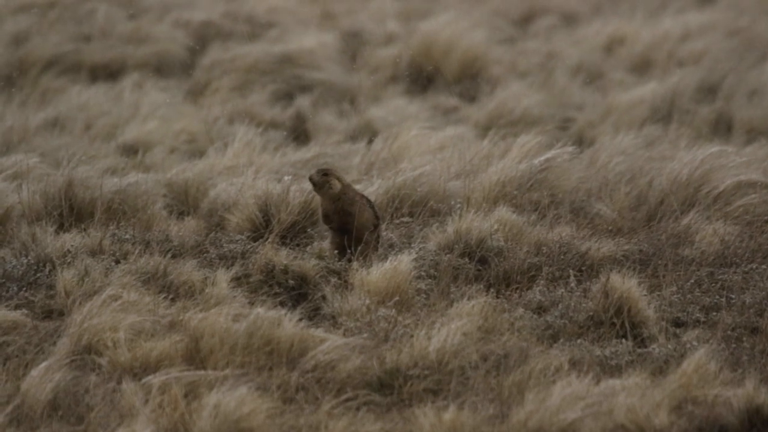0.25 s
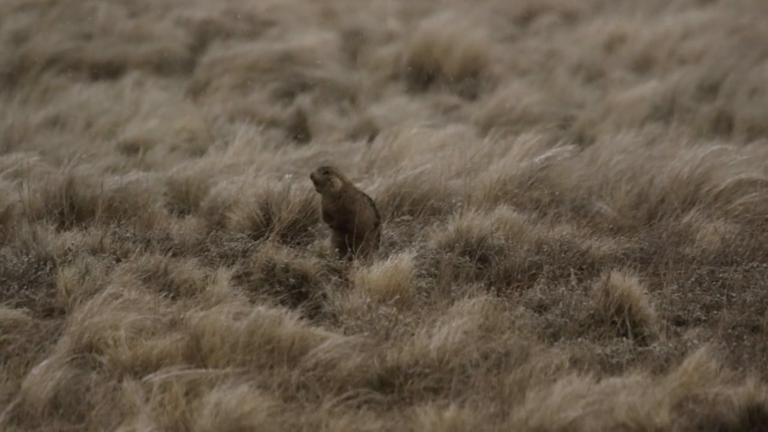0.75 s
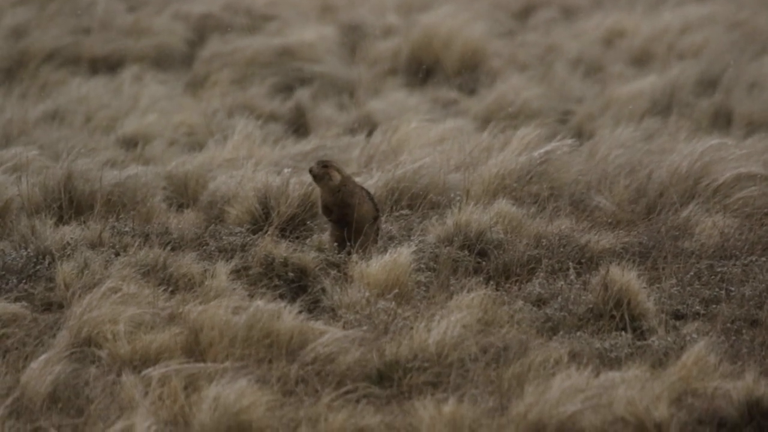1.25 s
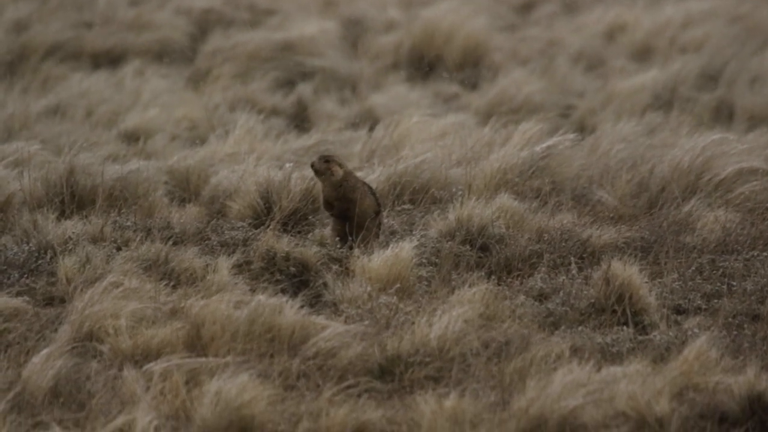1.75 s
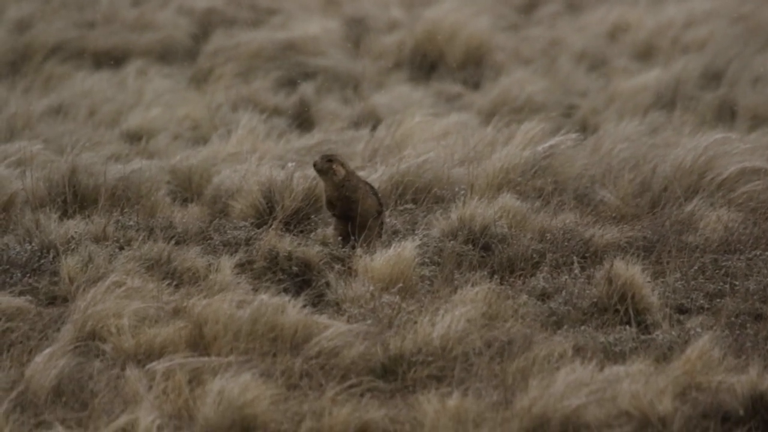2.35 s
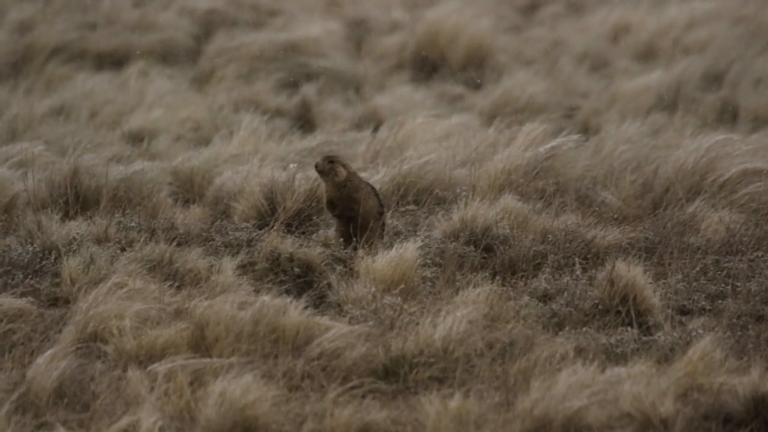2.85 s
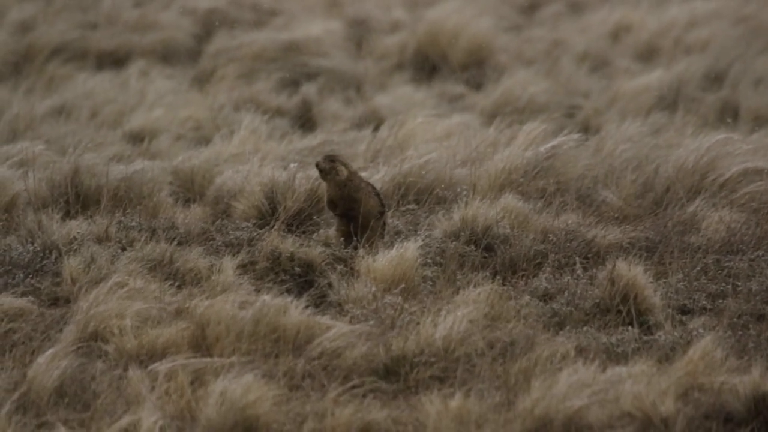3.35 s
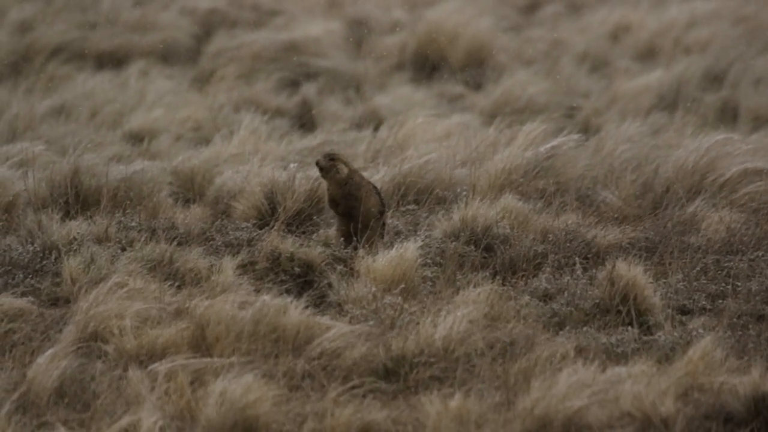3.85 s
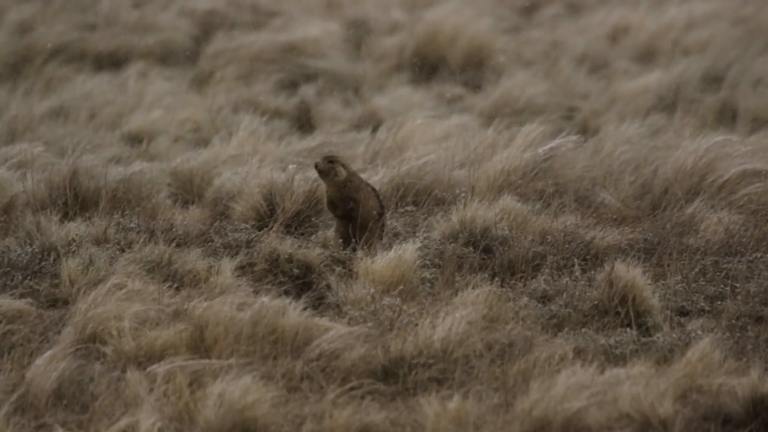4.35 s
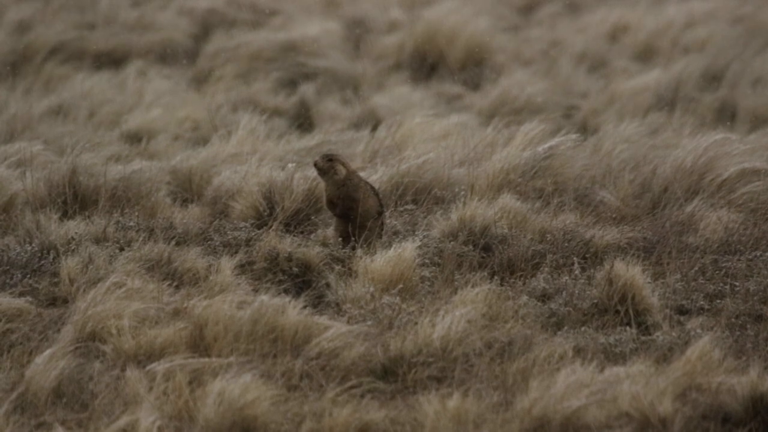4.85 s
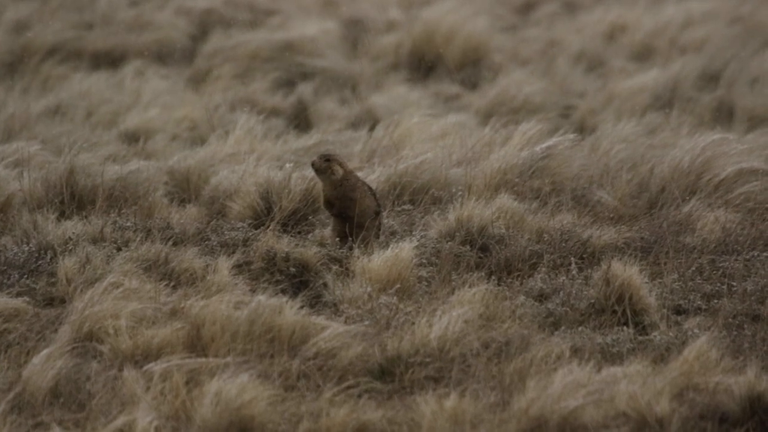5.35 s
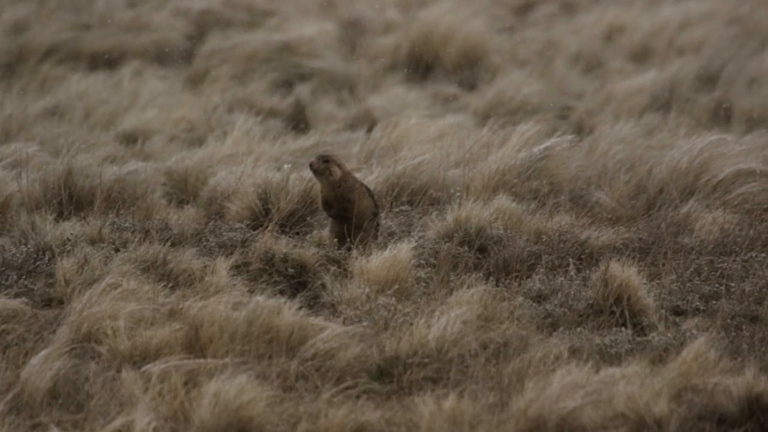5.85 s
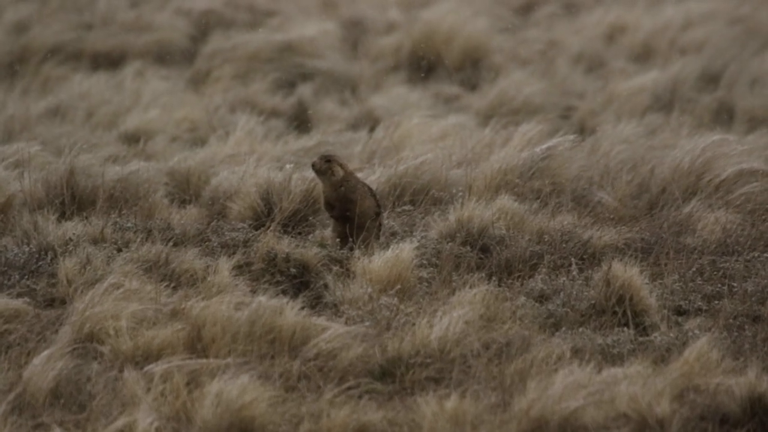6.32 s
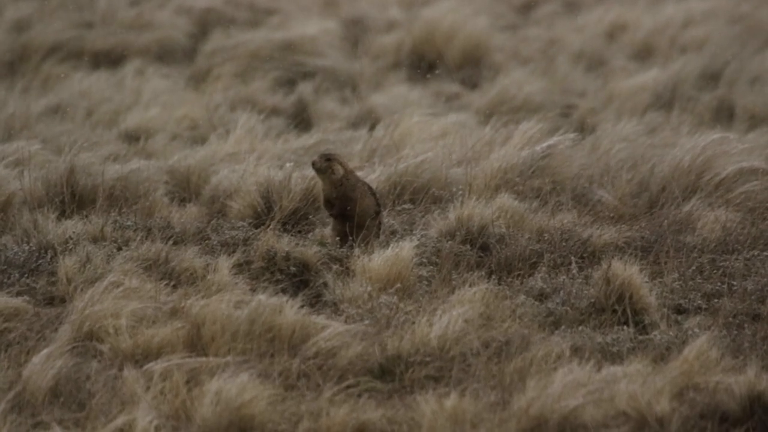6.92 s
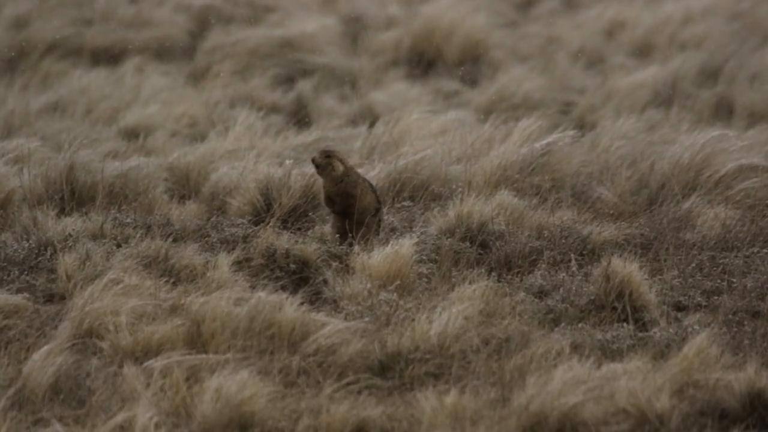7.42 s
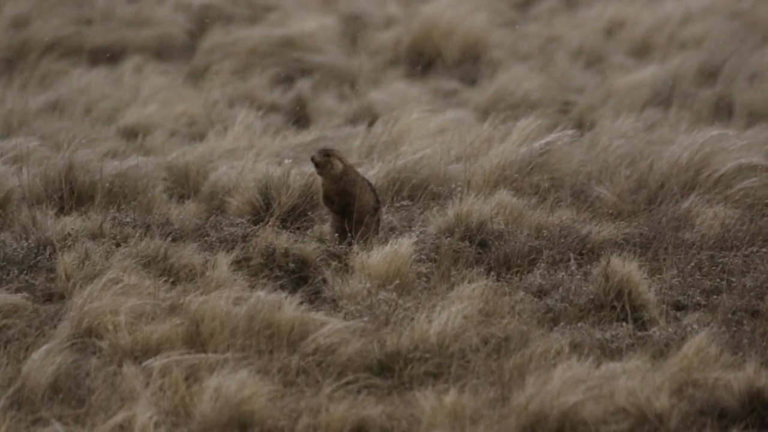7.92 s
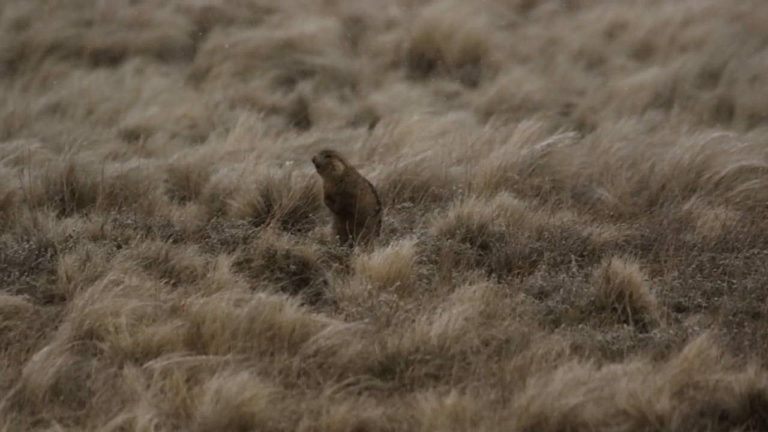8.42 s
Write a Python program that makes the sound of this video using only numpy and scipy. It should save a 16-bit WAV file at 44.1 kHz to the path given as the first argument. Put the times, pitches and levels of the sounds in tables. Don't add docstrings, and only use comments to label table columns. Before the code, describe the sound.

In open dry grassland a prairie dog barks in three bouts: five short, sharp, high yaps, a pause, five more, a longer pause, then four. Faint hoarse in-breaths follow a few. Close to the microphone, dry stalks rub, crackle and snap during the first two and a half seconds, then only isolated ticks. Low wind thumps come and go over soft hiss and a distant hum.

```python
import sys
import numpy as np
from scipy import signal
from scipy.fft import rfft, irfft, next_fast_len
from scipy.io import wavfile
from scipy.ndimage import uniform_filter1d, map_coordinates

SR = 44100
rng = np.random.default_rng(int(sys.argv[2]) if len(sys.argv) > 2 else 0)


def gain_from_db(level_db):
    decades = np.asarray(level_db, float) / 20
    return 10 ** decades


def unload_wav(signal):
    wavfile.write(
        sys.argv[1],
        SR,
        np.round(np.clip(np.atleast_2d(signal).T, -1, 1) * 32767).astype(np.int16),
    )


N = 382788
TIME = np.arange(N) / SR

# (start [s], length [s], top pitch [Hz], level [dB])
BARK_TIMES = [(0.2042, 0.095, 1010, -18), (.5435, 0.093, 1001, -19.5), (0.883, 0.094, 1003, -20),
              (1.226, 0.093, 990, -19.5), (1.614, 0.084, 976, -19.5), (3.5, 0.093, 996, -20),
              (3.885, 0.092, 1004, -19.5), (4.248, 0.095, 992, -21), (4.673, 0.084, 977, -23),
              (5.064, 0.084, 979, -23), (7.2936, 0.097, 1000, -19.5), (7.686, 0.1, 1018, -19.5),
              (8.065, 0.106, 1014, -18), (8.423, .1, 1000, -19.5)]
# (time after start [s], depth [dB], second push below first [dB])
THROAT_CATCHES = [(0.036, 4.5, 4.5), (0.038, 12, 2.5), (0.04, 12.5, 2), (0.031, 0, 4.5), (.035, 2, 4),
                  (0.043, 7, 4), (0.036, 5, 5), (0.036, 2, 3.5), (0.039, -1, 2.5), (0.039, 5, 3),
                  (0.036, 1, 3.5), (0.058, 5, 2), (0.038, 4, 4), (0.043, 4.5, 2)]
# (frequency [Hz], level [dB per Hz])
TEETH_AIR = [(3000, -40), (5500, -16), (7000, -7), (8500, 13), (10000, -13), (13500, 1), (16000, -36)]
BREATH_DB, BURST_DB, BURST_S = -37, -2, 0.012


def barks():
    out = np.zeros(N + SR)
    t = np.arange(SR // 6) / SR
    breath = coloured(rng.standard_normal(N), TEETH_AIR)
    for (start, length, top_hz, db), catch in zip(BARK_TIMES, THROAT_CATCHES):
        after = np.clip(t - length, 0, 1)
        level_db, ring_db = effort(t, length, top_hz, db, *catch)
        opening = np.clip(t / 0.00097, 0, 1) * np.clip(0.59 + t / 0.014, 0, 1)
        closing = gain_from_db(-600 * after - 4.5 * np.clip(after / 0.0011, 0, 1))
        gate = opening * closing

        voice = harmonics(t, length, top_hz, ring_db) * gate * gain_from_db(level_db - 1.1)
        air_db = level_db + BREATH_DB + BURST_DB * np.exp(-t / BURST_S)
        voice += gate * gain_from_db(air_db) * np.resize(breath[round(start * SR):], len(t))

        echo = scattered(voice)
        first = round(start * SR)
        mound = round((start + 0.014) * SR)
        out[first:][:len(t)] += voice
        out[mound:][:len(t)] += gain_from_db(-17) * voice
        out[first:][:len(echo)] += gain_from_db(-13.5) * echo
    return out[:N]


# (frequency [Hz], level [dB])
THROAT_COLOUR = [(700, -62), (1000, -38.5), (1500, -33), (2000, -12.5), (2600, 3.5), (3100, 0.5),
                 (3500, -1.5), (4100, -10), (5000, -15), (6000, -21.5), (6900, -34), (8000, -23),
                 (10000, -38), (15000, -52)]


def harmonics(t, length, top_hz, ring_db):
    order = np.arange(1, 35)[:, None] / 2
    rise, fall = arch(t, length, top_hz)
    jitter = 0.0073 + 0.05 * np.clip(np.clip(t - length, 0, 1) / 0.0092, 0, 1)
    pitch = top_hz * rise * fall * (1 + jitter * wobble(254, size=len(t)))
    hz = order * pitch

    mouth_db = ring_db * np.exp(-((hz - 2900) / 550) ** 2)
    mouth_db -= 13 * np.exp(-(t / 0.019) ** 2) / (1 + (hz / 2500) ** 8)
    mouth_db += 4 * np.exp(-(t / 0.022) ** 2 - ((hz - 3450) / 450) ** 2)
    mouth_db -= 14 * (1 - fall) * np.log2(hz / 2500 + 0.5)
    half_db = -20 * (order % 1 > 0)
    size = gain_from_db(along(THROAT_COLOUR, hz) + mouth_db + half_db)

    flutter = np.array([wobble(72.1, size=len(t)) + 0.59 * wobble(260, size=len(t), order=1)
                        for _ in order])
    flutter *= np.sqrt(np.clip(order / 4, 0, 1.6))
    phase = 2 * np.pi * order * np.cumsum(pitch) / SR - 0.4 * order
    voice = np.sum(size * gain_from_db(2.04 * flutter) * np.sin(phase), 0)
    voice *= 1 + 0.1 * wobble(910, size=len(t))
    return voice / np.sqrt(np.sum(size ** 2, 0) / 2)


START_BELOW, RISE_S, RISE_SHAPE = 0.43, 0.0142, 1.45
PEAK_S, SAG_PER_S_HZ, SAG_FROM_HZ = 0.036, 0.022, 965
END_BELOW, DROP_S, LAST_BELOW, TRAIL_S = 0.31, 0.0068, 0.19, 0.009
LEAD_PER_HZ, LEAD_FROM_HZ = 3e-5, 972


def arch(t, length, top_hz):
    u = t + LEAD_PER_HZ * (top_hz - LEAD_FROM_HZ)
    rise = 1 - START_BELOW * np.exp(-(u / RISE_S) ** RISE_SHAPE)
    rise -= SAG_PER_S_HZ * (top_hz - SAG_FROM_HZ) * np.clip(u - PEAK_S, 0, 1)
    left = length - t
    fall = 1 - END_BELOW * np.exp(-np.clip(left, 0, 1) / DROP_S)
    fall -= LAST_BELOW * (1 - np.exp(np.clip(left, -1, 0) / TRAIL_S))
    return rise, fall


SWELL_DB, SWELL_S = 5, 0.01
CLOSE_S, REOPEN_S = 0.0081, 0.018
TIRE_DB_PER_S, SPENT_DB, SPENT_S = 48, 3.5, 0.021
RING_DB_PER_HZ, RING_FROM_HZ = 0.23, 1032.5
RING_FADE_S, RING_KEEP = 0.015, 0.16
RING_REST_DB, RING_LOSS = -3.5, 1


def effort(t, length, top_hz, db, catch_s, depth_db, step_db):
    t = np.minimum(t, length)
    shut = np.clip(1 + (t - catch_s) / CLOSE_S, 0, 1)
    reopening = np.clip(1 - (t - catch_s) / REOPEN_S, 0, 1)
    catch_db = depth_db * np.minimum(shut, reopening)
    spent = np.exp((t - length) / SPENT_S)

    level_db = db - SWELL_DB * np.exp(-(t / SWELL_S) ** 2) - TIRE_DB_PER_S * t
    level_db -= step_db * shut + catch_db + SPENT_DB * spent
    lasting = RING_KEEP + (1 - RING_KEEP) * np.exp(-(t / RING_FADE_S) ** 2)
    ring_db = RING_REST_DB + RING_DB_PER_HZ * (RING_FROM_HZ - top_hz) * lasting
    ring_db -= RING_LOSS * catch_db + 1.7 * spent
    return level_db, ring_db


# (frequency [Hz], time to fall 60 dB [s])
GRASS_ECHO = [(1500, 0.031), (2400, 0.18), (3200, 0.085), (6000, 0.22), (12000, 0.044)]


def scattered(x):
    hz, t, z = signal.stft(rng.standard_normal(SR // 4), SR, nperseg=128)
    decay = gain_from_db(-60 * t / along(GRASS_ECHO, hz)[:, None])
    tail = signal.istft(z * decay, SR, nperseg=128)[1]
    return signal.fftconvolve(x, tail / np.linalg.norm(tail))


# (start [s], length [s], level [dB])
IN_BREATHS = [
    (.02, 0.2, -59),
    (0.394, 0.087, -60),
    (3.63, 0.24, -54.5),
    (7.442, 0.25, -56),
    (7.927, 0.12, -63),
]
# (frequency [Hz], level [dB per Hz])
WHEEZE_COLOUR = [(1500, -38), (2050, -0.5), (2380, 3), (2600, -8.5), (2850, 7), (3080, -4), (3350, 3),
                 (3800, -13), (5000, -15), (7000, -49)]
# (time [s], pitch [Hz], level [dB])
BREATH_WHISTLE = [
    (.05, 2390, -72.5),
    (.11, 2370, -61),
    (.155, 2397, -54),
    (.175, 2380, -62.5),
    (.19, 2350, -83),
]


def gasps():
    gain = np.zeros(N)
    for start, length, db in IN_BREATHS:
        since = TIME - start
        edges = np.clip(np.minimum(since, start + length - TIME) / 0.026, 0, 1)
        gain += gain_from_db(db - 14 * np.clip(since, 0, length)) * edges
    rattle = gain_from_db(1.2 * wobble(300) + 1.8 * wobble(120, order=1))
    wheeze = unit(rattle * coloured(rng.standard_normal(N), WHEEZE_COLOUR))
    hz, db = curves(BREATH_WHISTLE, TIME)
    whistle = gain_from_db(db + 4.0 + 2.6 * wobble(49)) * np.sin(2 * np.pi * np.cumsum(hz) / SR)
    return gain * wheeze + whistle


# (time [s], peak level [dB], rise [s], fall [s])
STIRRINGS = [(.03, -55, .2, 0.17), (.252, -50.5, 0.057, .11), (.49, -53.5, 0.19, 0.057),
             (.545, -51, 0.027, 0.1), (.716, -58.5, 0.066, 0.048), (.838, -61, 0.14, .03),
             (.95, -61, .15, .1), (1.0, -61, .02, .015), (1.24, -74, 0.038, .14), (1.53, -57.5, .17, .5),
             (1.72, -53.5, 0.39, 0.056), (1.98, -45, .35, 0.31), (2.07, -49.5, 0.13, 0.33),
             (2.35, -62.5, .3, .04)]
# (frequency [Hz], level [dB per Hz])
RUB_COLOUR = [(470, -40), (800, -6), (1390, 1), (2040, 6.5), (2550, 4), (5070, -3), (10200, -5),
              (12300, -12), (15800, -31)]
# (frequency [Hz], level [dB])
CRACKLE_COLOUR = [(1500, -7), (4000, 0.5), (7000, 0.5), (11500, 0.5), (13500, -9), (15800, -16)]
# (frequency [Hz], level over the crackle's colour [dB])
TIP_COLOUR = [(3000, -1), (7000, -7), (11000, 3), (15800, 9)]
TIPS_FROM_S, TIPS_TO_S = 1.85, 2.05
CRACKLE_DB = 1.5


def rustle():
    when, size, pitch = rng.random((2800, 3)).T
    tiny = snaps(when * 2.45, -3.8 * np.log(size + 0.027), 13500 * gain_from_db(-7 * pitch), cycles=8.3)
    crackle = coloured(tiny * gain_from_db(1.6 * wobble(45.3)), CRACKLE_COLOUR)
    tips = np.clip((TIME - TIPS_FROM_S) / (TIPS_TO_S - TIPS_FROM_S), 0, 1)
    crackle = (1 - tips) * crackle + tips * coloured(crackle, TIP_COLOUR)
    rub = gain_from_db(3.2 * wobble(60, order=1)) * rush(RUB_COLOUR, patchy_db=-0.3)
    return (rub + gain_from_db(CRACKLE_DB - 1.8) * crackle) * gain_from_db(-3.0) * swells(STIRRINGS, shape=1.34)


# (time [s], peak level [dB], pitch [Hz])
STALK_SNAPS = [(0.051, -24, 7300), (0.1135, -31, 9100), (0.253, -28.5, 5000), (0.301, -25, 5000),
               (0.3764, -34, 9050), (0.385, -33.5, 9200), (0.408, -28.5, 7540), (0.438, -26, 9700),
               (0.4673, -36, 6490), (0.4904, -27, 7300), (0.4987, -23, 7300), (0.7216, -35, 7620),
               (0.8131, -35, 7340), (1.0006, -27, 7890), (1.5265, -30, 7200), (1.5382, -26, 6690),
               (1.726, -25.5, 7300), (1.78, -26, 7350), (1.803, -26, 8000), (1.853, -25, 8700),
               (1.9093, -16, 10500), (1.936, -19, 7920), (2.0033, -18, 9770), (2.0218, -31, 8430),
               (2.043, -23, 7910), (2.064, -29, 7890), (2.0827, -29.5, 10300), (2.1829, -31, 11800),
               (2.214, -26, 10100), (2.248, -24, 10700)]
# (time [s], peak level [dB], pitch [Hz])
SETTLING_SNAPS = [(2.3524, -34, 10000), (2.605, -41, 8700), (2.7852, -32.5, 10400), (3.4181, -42, 5080),
                  (3.695, -34, 7850), (3.7519, -42, 6000), (4.1894, -38, 6500), (4.4573, -36, 8280),
                  (4.6163, -38, 8620), (5.4131, -36.5, 7360), (5.885, -39, 10100), (6.0376, -40, 6300),
                  (6.694, -41, 6470)]
# (time [s], peak level [dB], pitch [Hz])
STEM_KNOCKS = [(1.468, -36, 1900), (1.645, -28.5, 1450), (2.045, -27, 1460), (2.215, -28.5, 3900),
               (2.27, -36, 2800), (2.349, -32, 2950), (2.606, -40, 2500), (4.99, -50, 2500),
               (5.41, -43, 1500), (5.415, -34.5, 4830), (5.577, -40, 3500), (5.613, -44, 890),
               (5.733, -44, 3300), (7.17, -41, 3530)]
STRAY_DB, STRAY_SPREAD_DB = -52, 3.5


def ticks():
    s, db, hz = np.concatenate([STALK_SNAPS, SETTLING_SNAPS]).T
    stalks = snaps(s + 0.00072, db + 3.5, hz, cycles=6.1)
    stems = snaps(*np.transpose(STEM_KNOCKS), cycles=10.0)
    when, size, pitch = rng.random((60, 3)).T
    stray_db = STRAY_DB - STRAY_SPREAD_DB * np.log(size + 0.05)
    stray = snaps(when * N / SR, stray_db, 10000 * gain_from_db(-9 * pitch), cycles=9)
    return stalks + stems + stray


# (time [s], peak level [dB], rise [s], fall [s])
WIND_GUSTS = [(.01, -38.5, .1, 0.13), (.275, -23.5, 0.037, 0.025), (.41, -36, 0.16, 0.054),
              (.505, -26.5, 0.048, 0.065), (.77, -47, .2, .15), (.87, -45, 0.13, 0.11),
              (1.18, -44, 0.061, 0.29), (1.41, -37.5, 0.081, 0.37), (1.67, -42, 0.063, 0.095),
              (1.965, -38.5, 0.084, 0.17), (2.6, -41, 0.039, 0.046), (3.24, -47.5, 0.19, .2),
              (3.58, -49, 0.21, 0.12), (3.84, -52, .2, .6), (4.23, -45, 0.18, .1),
              (4.69, -35.5, .055, 0.062), (4.77, -42, .03, .15), (4.95, -50, .06, .25),
              (5.15, -33.5, 0.085, 0.018), (5.93, -36, 0.065, 0.17), (6.01, -29.5, 0.11, 0.018),
              (6.09, -41.5, .08, 0.09), (6.625, -26.5, 0.09, 0.058), (7.08, -36, 0.035, 0.066),
              (7.28, -37, .045, 0.063), (7.525, -28.5, 0.042, 0.034), (7.66, -53, .1, 0.055),
              (8.12, -50, .12, .15), (8.63, -34.5, 0.049, 0.038)]
# (frequency [Hz], level [dB per Hz])
THUMP_COLOUR = [(15, -40), (30, -9.5), (60, -5), (90, -4.5), (130, -7), (200, -20.5), (400, -36),
                (900, -45.5), (4000, -65), (9000, -75)]
LULL_DB, LULL_SWAY_DB = -59.5, 6.5


def wind():
    swirl = rush(THUMP_COLOUR, patchy_db=5.0)
    loudness = np.sqrt(np.abs(uniform_filter1d(swirl ** 2, size=1200)))
    lumps = unit(swirl / (0.13 + loudness))
    lull = gain_from_db(LULL_DB + LULL_SWAY_DB * wobble(15))
    gain = np.hypot(swells(WIND_GUSTS, shape=0.92), lull)
    return gain * gain_from_db(-3.0 + 0.66 * wobble(30)) * lumps


# (frequency [Hz], level [dB per Hz])
DRONE_COLOUR = [(20, -19), (60, -19.5), (115, -1.5), (150, -12), (192, 6), (245, -17), (305, -0.5),
                (345, -7.5), (390, 0), (460, -12), (650, -13), (900, -25), (1300, -39)]
DRONE_DB, DRONE_SWAY_DB = -51.5, 1


def drone():
    return gain_from_db(DRONE_DB + 1.5 + DRONE_SWAY_DB * wobble(3.005)) * rush(DRONE_COLOUR, patchy_db=0.42)


# (time [s], peak level [dB], rise [s], fall [s])
BREEZE_PUFFS = [
    (.02, -67, .1, 0.28),
    (1.3, -55.5, 0.25, 0.5),
    (4.1, -62, .4, 0.67),
    (6.68, -57, .15, .25),
    (8.2, -58.5, .8, 0.84),
]
# (frequency [Hz], level [dB per Hz])
HISS_COLOUR = [(410, -5), (700, -5.5), (885, -9.5), (1430, -8.5), (1590, -10), (1810, -10), (3970, -13.5),
               (4580, -18.5), (6680, -16), (15800, -22.5)]
HISS_DB, STIRRED_DB = -57.5, -5


def hiss():
    steady = gain_from_db(HISS_DB + 0.41 * wobble(1.45))
    stirred = gain_from_db(STIRRED_DB) * uniform_filter1d(swells(STIRRINGS, shape=1.55), size=8000)
    gain = np.hypot(steady, stirred + swells(BREEZE_PUFFS, shape=2.1))
    return gain * gain_from_db(-1.0) * rush(HISS_COLOUR, patchy_db=1.1)


def snaps(s, db, hz, cycles):
    t = np.arange(SR // 150) / SR
    turns = hz[:, None] * t
    rough = 1 + 0.3 * rng.standard_normal(turns.shape)
    decay = gain_from_db(db[:, None] - 60 * turns / cycles)
    ring = decay * np.clip(turns / 0.17, 0, 1) * np.sin(2 * np.pi * turns) * rough
    at = np.round(s * SR).astype(int)[:, None] + np.arange(len(t))
    return np.bincount(at.ravel(), ring.ravel(), N + SR)[:N]


def swells(rows, shape):
    t = np.arange(0, N / SR + 0.01, 0.001)
    s, db, rise, fall = np.transpose(rows)[..., None]
    away = np.where(t < s, (s - t) / rise, (t - s) / fall)
    power = np.sum(gain_from_db(db - 20 * away ** shape) ** 2, 0)
    return np.interp(TIME, t, np.sqrt(power))


def rush(spectrum, patchy_db):
    z = signal.stft(rng.standard_normal(N), nperseg=512)[2]
    field = uniform_filter1d(rng.standard_normal(z.shape), 6, 0)
    field = uniform_filter1d(field, 14, 1)
    noise = signal.istft(z * gain_from_db(patchy_db * unit(field)), nperseg=512)[1][:N]
    return coloured(noise, spectrum)


def coloured(x, spectrum):
    m = next_fast_len(N + 8192)
    gain = gain_from_db(along(spectrum, np.fft.rfftfreq(m, 1 / SR)))
    return unit(irfft(rfft(x, m) * gain, m)[:N])


def wobble(rate, size=N, order=3):
    knots = rng.standard_normal(int(size * rate / SR) + 4)
    return map_coordinates(knots, [np.arange(size) * rate / SR], order=order)


def along(points, hz):
    f, v = np.transpose(points)
    return np.interp(np.log(hz + 1), np.log(f + 1), v)


def curves(rows, t):
    s, *cols = np.transpose(rows)
    return [np.interp(t, s, c) for c in cols]


def unit(x):
    return x / np.sqrt(np.mean(x ** 2) + 1e-20)


def scene():
    animal = barks() + gasps()
    stalks = rustle() + ticks()
    background = wind() + drone() + hiss()
    return (animal + stalks + background)[None]


def band_limit(x):
    return signal.sosfilt(signal.butter(12, 16450, fs=SR, output="sos"), x)


def record(dry):
    m = next_fast_len(N)
    passed = np.fft.rfftfreq(m, 1 / SR) < 15780
    mix = irfft(rfft(dry, m) * passed, m)[:, :N]
    return band_limit(mix)


dry = scene()
out = record(dry)
unload_wav(out)
```